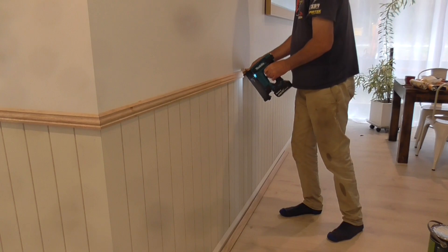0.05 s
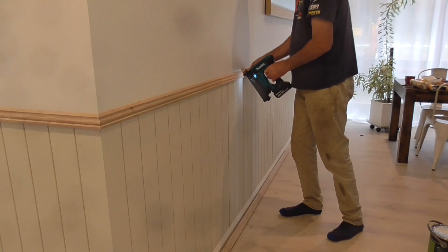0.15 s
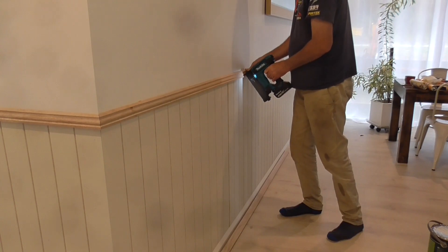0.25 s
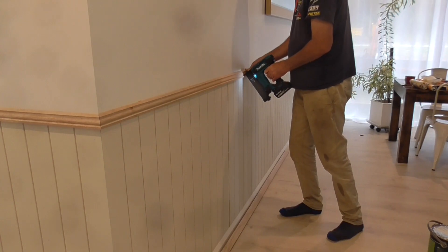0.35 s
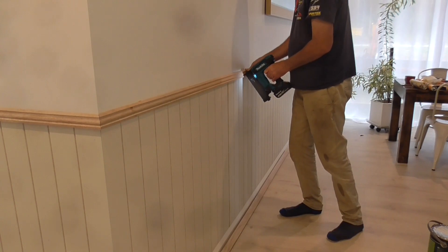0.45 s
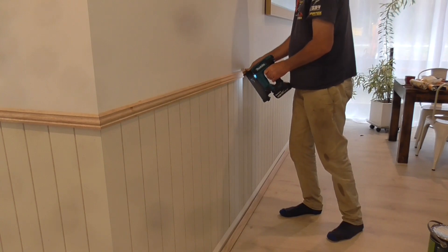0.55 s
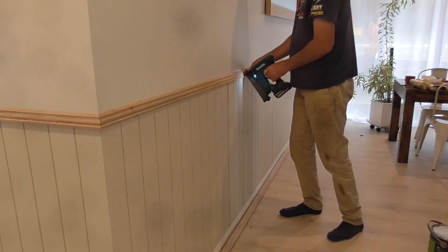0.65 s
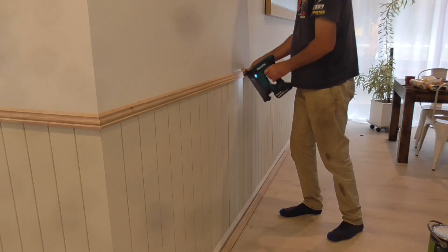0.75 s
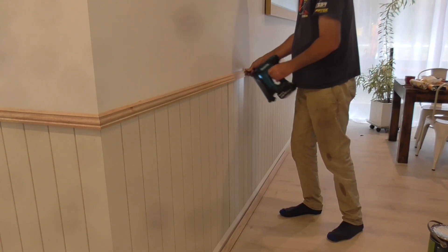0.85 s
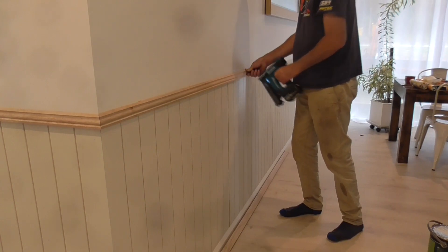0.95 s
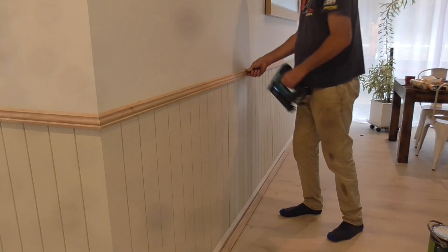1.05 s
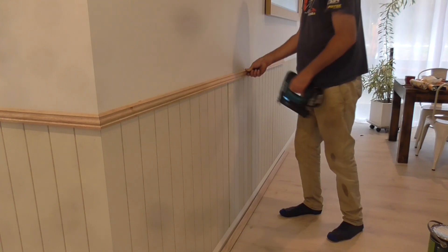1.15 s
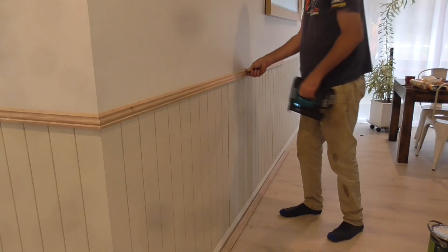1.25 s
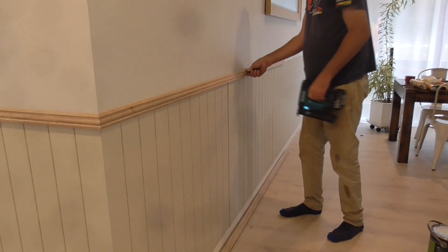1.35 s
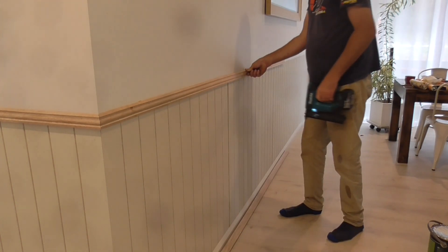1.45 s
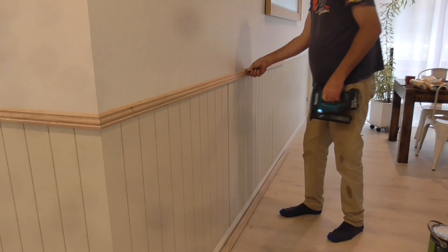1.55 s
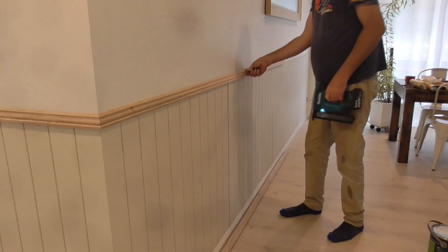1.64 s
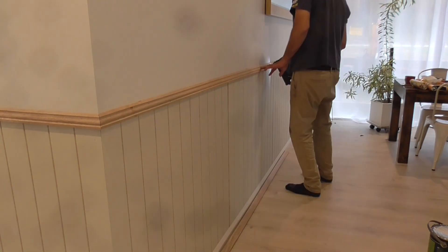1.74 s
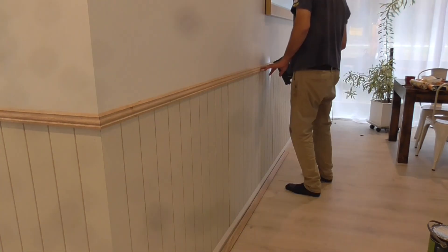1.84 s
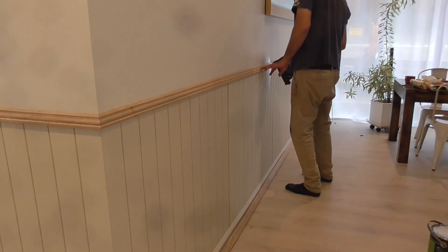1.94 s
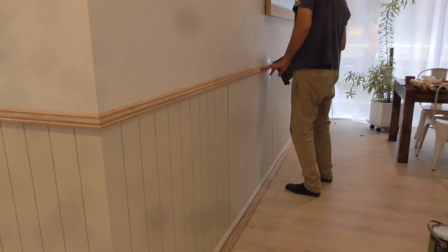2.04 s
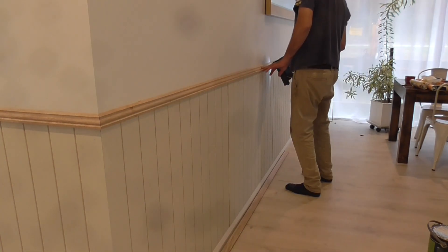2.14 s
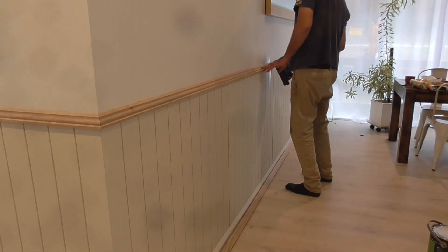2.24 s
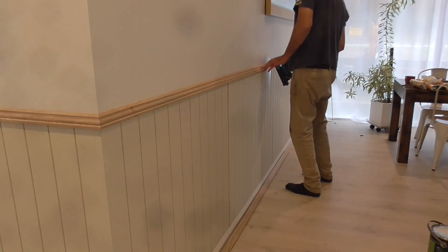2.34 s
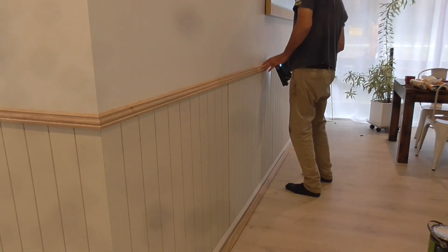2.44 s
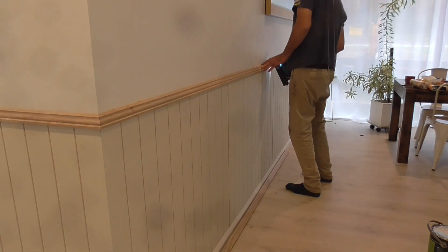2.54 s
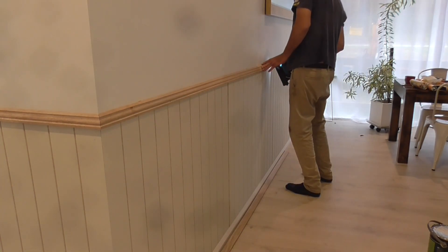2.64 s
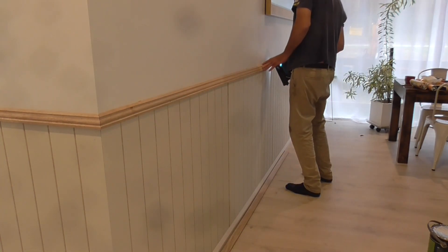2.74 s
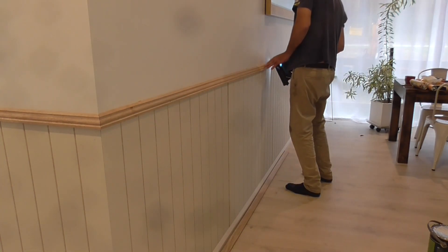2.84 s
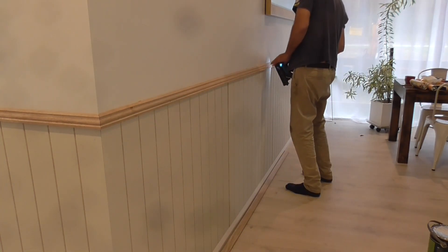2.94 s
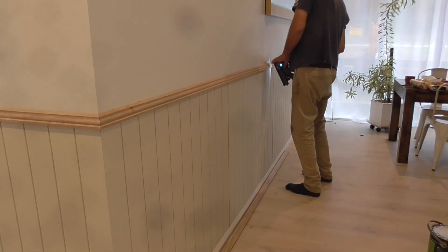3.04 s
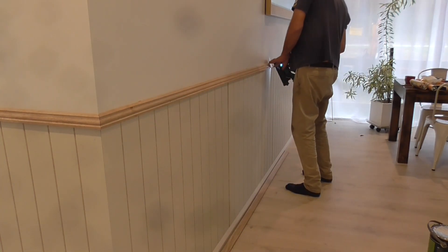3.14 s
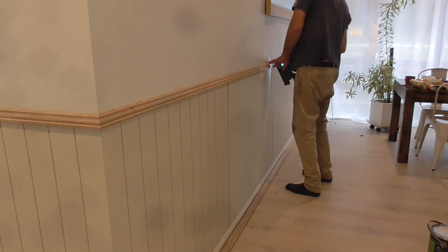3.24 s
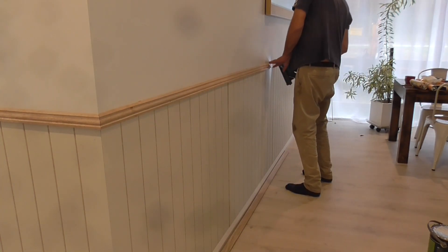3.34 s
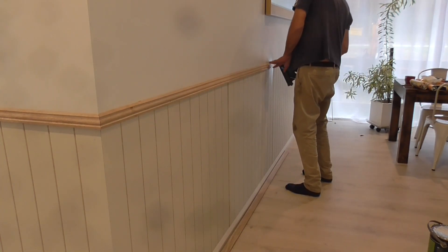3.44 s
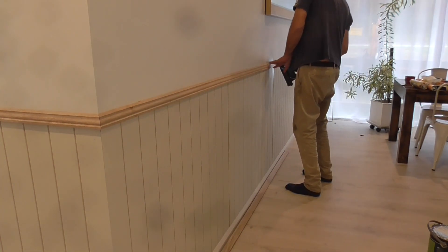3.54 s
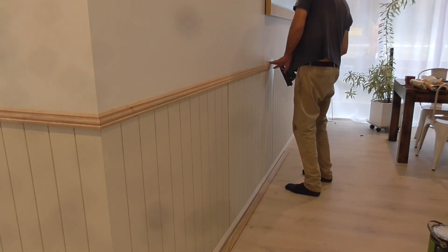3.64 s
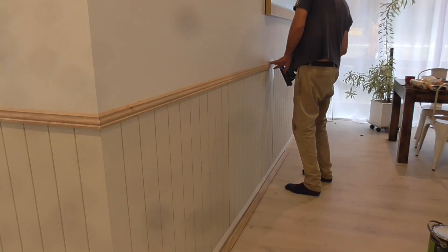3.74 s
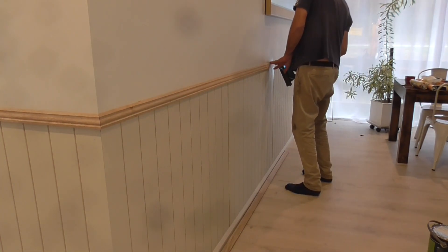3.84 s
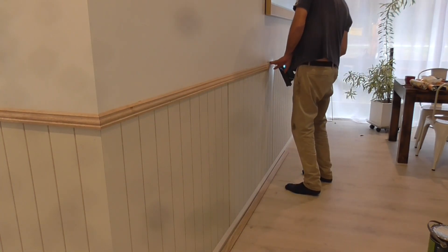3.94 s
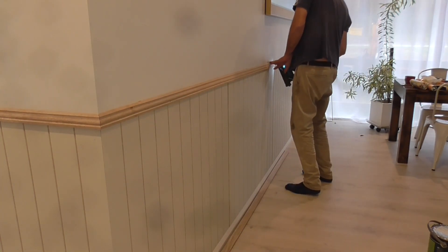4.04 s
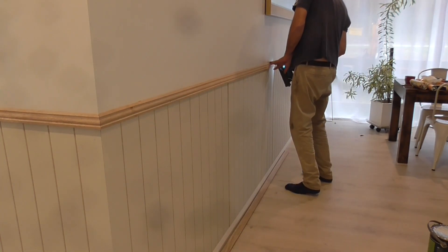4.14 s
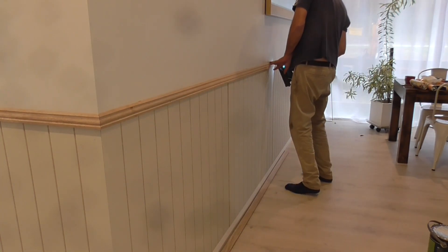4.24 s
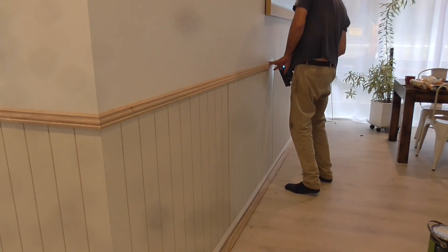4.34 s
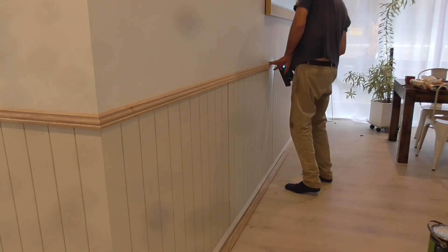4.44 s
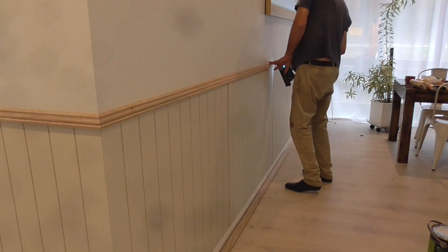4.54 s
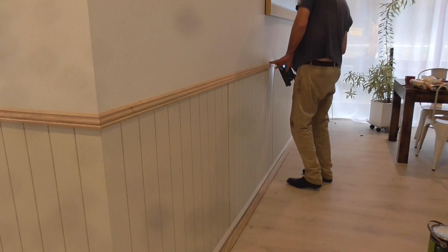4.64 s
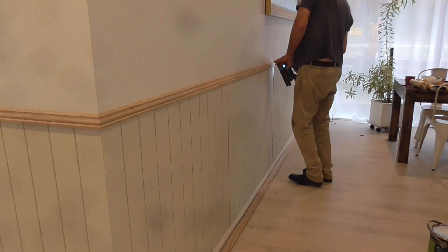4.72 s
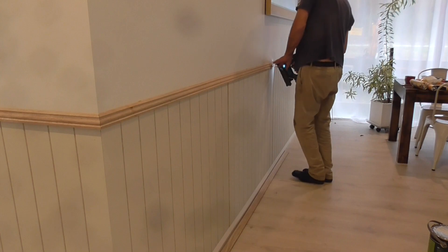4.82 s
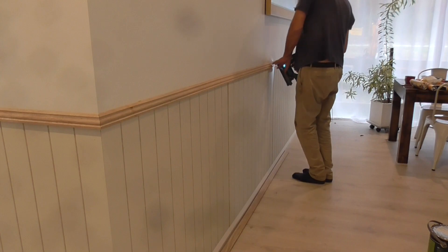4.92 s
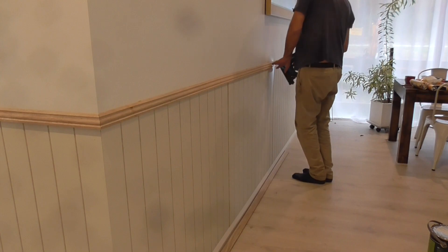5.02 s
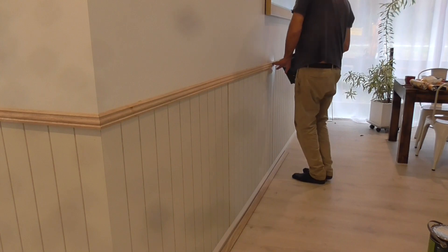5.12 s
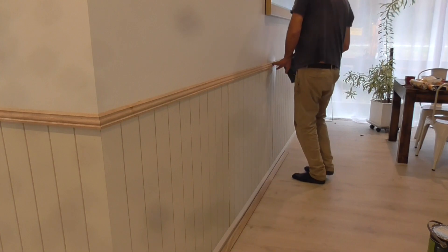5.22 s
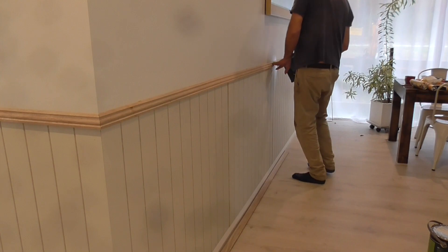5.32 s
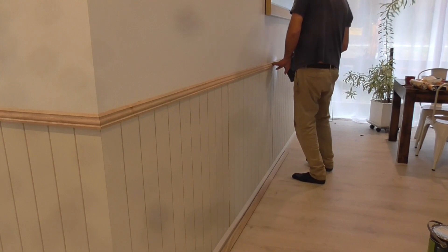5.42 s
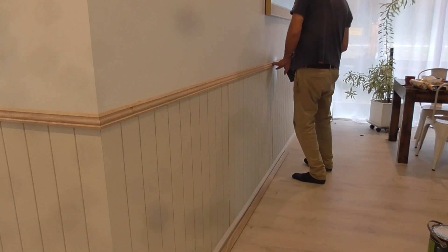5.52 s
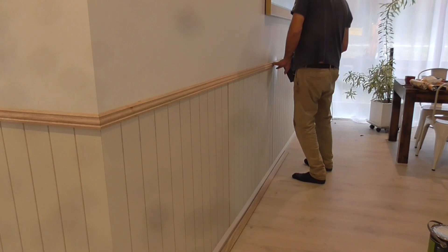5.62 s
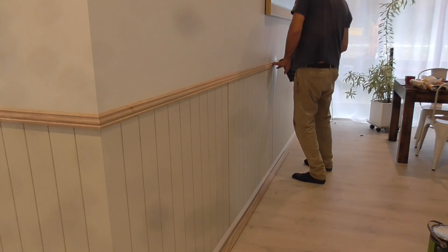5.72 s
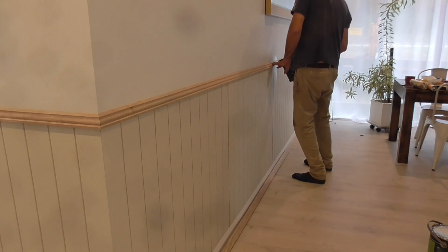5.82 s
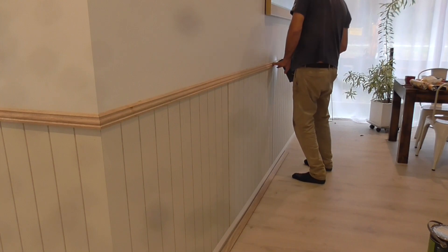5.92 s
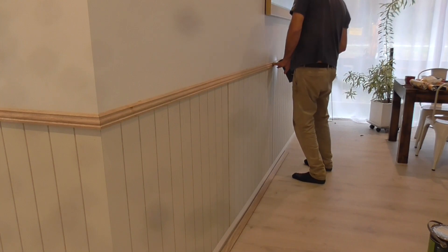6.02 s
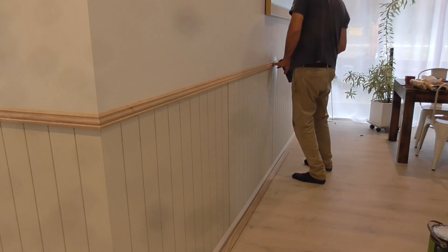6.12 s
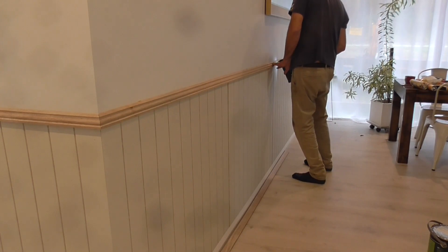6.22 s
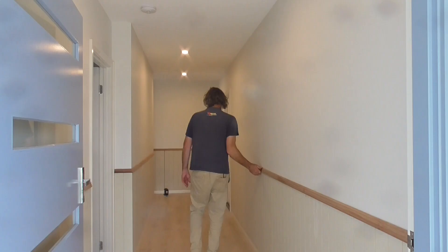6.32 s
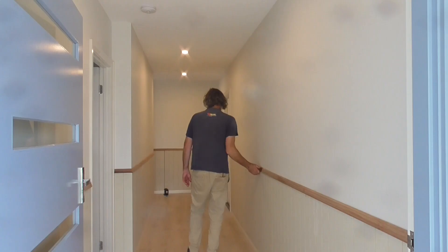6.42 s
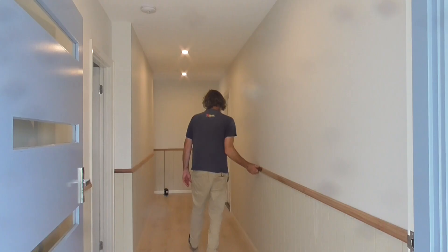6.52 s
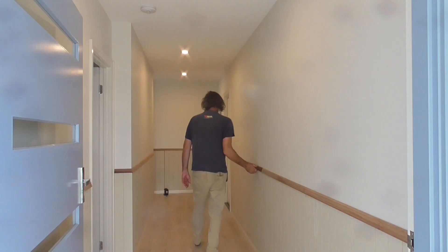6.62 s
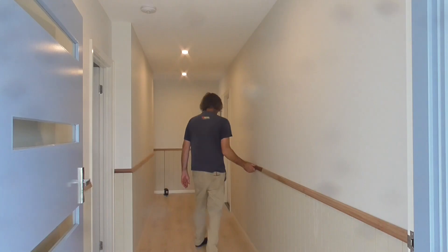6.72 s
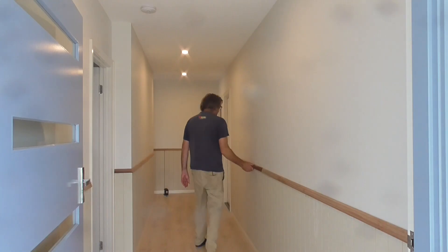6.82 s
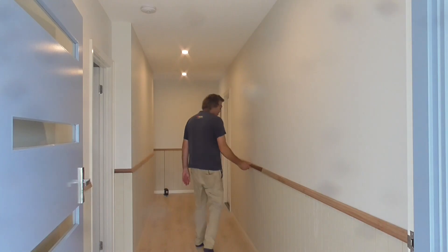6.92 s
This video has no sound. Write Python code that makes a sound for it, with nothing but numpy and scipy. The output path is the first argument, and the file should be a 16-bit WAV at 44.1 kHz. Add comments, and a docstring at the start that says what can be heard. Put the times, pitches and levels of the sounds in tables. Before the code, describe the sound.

A cordless nailer fixes a wooden rail to a wall, a few metres from the microphone in a reverberant, hard-floored room. Three times the tool knocks lightly on the wood, its motor whirrs briefly, a nail slams in with a loud crack, and the nose clicks back. A few soft knocks follow. At the very end, the quiet room tone gives way to a hallway's low hum and faint hiss.

```python
"""A cordless nailer pins a wooden rail to a panelled wall: three shots, metres away in a hard-floored room.
Each time the nose scuffs and knocks onto the rail, the trigger clicks, a geared motor winds the piston
against a gas spring, the driver slams the nail home and the nose springs back. These forces excite the
resonances of wood, housing and steel. The room reverberates and gain control ducks the shots.
At the end the room's hush gives way to a humming hallway, where a hand slides along a rail."""
import sys
import numpy as np
from scipy import signal
from scipy.fft import rfft, irfft
from scipy.io import wavfile
from scipy.ndimage import uniform_filter1d, minimum_filter1d

SR = 44100
rng = np.random.default_rng(int(sys.argv[2]) if len(sys.argv) > 2 else 0)


def put_to_file(sound):
    """Save the sound as 16-bit audio at rate SR, in the file named by the first command-line argument."""
    columns = np.atleast_2d(sound).T  # one column per channel
    safe = np.clip(columns, -1, 1)
    whole_steps = np.round(safe * 32767)
    wavfile.write(sys.argv[1], SR, whole_steps.astype(np.int16))


N = 307364
TIME = np.arange(N) / SR
WIND_UP_S, SCUFF_S = .096, .05  # motor start to strike; rubbing ahead of a contact


def undb(db):
    """Amplitude ratio of a level in decibels."""
    return 10 ** (np.asarray(db) / 20)


def unit(x):
    """Normalisation to unit energy."""
    return x / np.sqrt(np.sum(x ** 2))


def add(track, s, sound):
    """Superposition: a sound joins the track at time s."""
    start = max(int(s * SR), 0)
    track[start:start + len(sound)] += sound[:N - start]


def highpass(x, hz, order=1):
    """Butterworth filtering: frequencies below the cutoff are attenuated."""
    return signal.sosfilt(signal.butter(order, hz, "high", fs=SR, output="sos"), x)


def colour(x, spectrum, size=4096):
    """Minimum-phase filtering to a spectral shape; white noise keeps its power."""
    hz, db = np.transpose(spectrum)
    grid = np.maximum(np.fft.rfftfreq(size, 1 / SR), 1)
    magnitude = undb(np.interp(np.log(grid), np.log(hz), db))
    cepstrum = irfft(np.log(magnitude))
    cepstrum[1:size // 2] *= 2
    cepstrum[size // 2 + 1:] = 0
    response = unit(irfft(np.exp(rfft(cepstrum))))
    return signal.oaconvolve(x, response)[:len(x)]


def drift(rate_hz):
    """Slow random modulation with a spread near one."""
    return np.interp(TIME * rate_hz, np.arange(1000), rng.standard_normal(1000))


def tone(start, length, hz, db, waver, fade_db_per_s=0, edge_s=0.035):
    """A gated sinusoid with slight random frequency and amplitude modulation."""
    age = np.clip(TIME - start, 0, None)
    gate = np.clip(np.minimum(age, length + edge_s - age) / edge_s, 0, 1)
    turns = np.cumsum(hz * (1 + waver * drift(16))) / SR
    return np.sqrt(2) * np.sin(2 * np.pi * turns) * gate * undb(db - fade_db_per_s * age + 2 * drift(30))


def hush(spectrum, db, wide_hz):
    """Partly coherent noise: left and right are less alike above wide_hz."""
    mid, side = (colour(rng.standard_normal(N), spectrum) for _ in range(2))
    side = 0.57 * side + 0.19 * highpass(side, wide_hz)
    return undb(db + drift(6)) * (mid + np.array([side, -side]))


# Noise spectrum of the room's still air: (frequency [Hz], relative density [dB])
ROOM_AIR = [(15, -45.5), (25, -22), (40, -16.5), (97, -21), (166, -21.5), (317, -22), (641, -24),
            (695, -20.5), (1020, -28), (1130, -24.5), (1840, -34.5), (2900, -41.5), (4140, -38),
            (6050, -42), (11000, -39), (16000, -54)]
# Faint low drones: (start [s], duration [s], frequency [Hz], level [dB])
DRONES = [(1.77, 1.0, 90.2, -57.5), (4.275, 2.4, 118.4, -64)]
# Noise spectrum of the hallway: (frequency [Hz], relative density [dB])
HALL_AIR = [(15, -43), (25, -23), (64, 1), (108, -8), (223, -2), (301, -10.5), (363, -8), (405, -12),
            (840, -14), (1190, -20), (1480, -23), (1790, -28), (6050, -30), (9320, -21.5), (16000, -36)]
# Partials of the hallway hum: (frequency [Hz], level [dB])
HALL_HUM = [(75.4, -57.5), (226.1, -61), (371.4, -59), (1475, -73)]
# Friction spectrum of a hand on the hallway rail: (frequency [Hz], relative density [dB])
HAND_RUB = [(1500, -30), (2900, -10), (3650, 3), (4500, 2), (6500, -18), (12000, -32)]


def background(quieter_from_s=1.765, hallway_from_s=6.402):
    """Ambient noise and tones: the room's hush and drones, then the hallway's hiss, hum and friction."""
    hum = 0
    for hz, db in HALL_HUM:
        amplitude = np.sqrt(2) * undb(db + 6.3 * drift(28))
        hum += amplitude * np.sin(2 * np.pi * hz * TIME + .5 * drift(9.1))
    drone = sum(tone(*row, waver=0.018) for row in DRONES)
    air_db = np.where(TIME < quieter_from_s, -55.5, -59.5)
    room = hush(ROOM_AIR, air_db, wide_hz=600) + drone
    hand = hush(HAND_RUB, db=-65.5 + 0.73 * drift(7.7), wide_hz=2000)
    hallway = hush(HALL_AIR, db=-48.4, wide_hz=2980) + hum + hand
    return np.where(TIME < hallway_from_s, room, hallway)


# Reverberant field: (frequency [Hz], T60 [s], echo-to-direct ratio [dB], left-right coherence [0-1])
ROOM_ECHOES = [(58, 0.54, -3.5, 0.89), (298, 0.86, 2.5, 0.89), (1000, 1, -3.5, 0.77), (2150, 1, -1, 0.73),
               (4570, 0.83, -1, 0.76), (8150, 0.72, -5, 0.2), (12000, 0.47, -6.5, 0.18),
               (16050, 0.49, -2, 0.11)]


def reverberation(x, gap_s=0.0018, build_s=0.0019, right_db=0.5, early=1.33, early_s=0.07, bands=18):
    """Direct sound plus a diffuse field, whose top treble decays sooner and is less coherent."""
    hz, *columns = np.transpose(ROOM_ECHOES)
    t = TIME[:SR]
    centres = np.geomspace(60, 16000, bands)
    noise = rfft(rng.standard_normal((2, SR)))
    swell = 1 - np.exp(-np.maximum(t - gap_s, 0) / build_s)
    swell *= 1 + early * np.exp(-t / early_s)  # the near wall and floor crowd the first echoes
    response = np.zeros((2, SR))
    for centre, pick in zip(centres, np.eye(bands)):
        t60, db, coherence = (np.interp(np.log(centre), np.log(hz), c) for c in columns)
        mid, side = irfft(noise * np.interp(np.arange(SR // 2 + 1), centres, pick))
        pair = np.sqrt((1 + coherence) / 2) * mid + np.sqrt((1 - coherence) / 2) * np.array([side, -side])
        # the bare wall reflects more treble to the right
        balance = undb(right_db * (1 - coherence) * np.array([[-1], [1]]))
        response += balance * pair * undb(db) * unit(swell * np.exp(-np.log(1000) * t / t60))
    response[:, 0] += 1
    return signal.oaconvolve(x[None], response, axes=1)[:, :N]


def scattering(x, split_hz=6500, side_db=-2, right_db=-12, scatter_s=0.00092, size=256):
    """Scattering by a small body at the listening point sends treble unequally to left and right."""
    treble = highpass(x, split_hz)
    t = TIME[:size]
    paths = unit(rng.standard_normal(size) * t * np.exp(-t / scatter_s))
    side = undb(side_db) * signal.oaconvolve(treble, paths)[:N] - undb(right_db) * treble
    return np.array([side, -side])


# Low ring after each blow: (frequency [Hz], level [dB], decay rate [dB/s])
RINGS = [(408.7, -41, 18), (341, -34, 43.5), (510, -48.5, 30)]


def lingering_rings(strikes, length_s=0.65):
    """Free decay: each blow leaves a low tone, different at each place along the rail."""
    return sum(tone(s, length_s, hz, db, waver=0.0059, fade_db_per_s=fade)
               for s, (hz, db, fade) in zip(strikes, RINGS))


# Modes of the rail and wall panels: (frequency [Hz], relative level [dB], T60 [s])
WALL_MODES = [(103, -9.5, .3), (133, -5, 0.26), (172.1, -2.5, 0.32), (287.5, -9.5, 0.65),
              (296.4, 2.5, 0.23), (332.2, 3.5, 0.22), (394.8, -8.5, 0.63), (418, 6.5, 0.059),
              (518, -3.5, 0.12), (548, -5, 0.2), (710, -16, 0.06), (908, -1.5, 0.11), (1046, -4, 0.073),
              (1190, -7.5, 0.19)]
# Responses of rail, hollow wall, plastic housing, steel nose, spring: (frequency [Hz], relative gain [dB])
WOOD = [(35, -35.5), (70, -19), (130, -15.5), (320, 5), (520, 4), (700, -6.5), (1150, -5.5), (1750, -19),
        (4000, -25.5), (12000, -43)]
THUD = [(30, -38.5), (65, -3.5), (110, -5), (165, -2), (220, -7.5), (300, -8), (700, -24.5), (3000, -59)]
HOUSING = [(120, -6.5), (350, -2.5), (620, -5.5), (820, -3.5), (1080, -1), (1290, -2.5), (1500, -8),
           (1800, -19.5), (4000, -21.5), (12000, -32.5)]
STEEL = [(200, -15.5), (1200, -6.5), (1900, -8), (3500, 1.5), (5200, -1), (9000, 5.5), (12000, -3),
         (16000, -19)]
SPRING = [(300, -24), (1500, -12), (2600, -22), (3600, -8), (5500, -10), (7500, -3.5), (9500, -3),
          (12000, -12.5), (15500, -29.5)]


def radiation(forces):
    """Forced vibration: five bodies each filter their force; the rail knocks dead, the panels ring on."""
    wood, thud, housing, steel, spring = forces
    t = TIME[:SR]
    modes = sum(undb(db) * np.sin(2 * np.pi * hz * t) * np.exp(-np.log(1000) * t / t60)
                for hz, db, t60 in WALL_MODES)
    panels = signal.oaconvolve(wood, unit(modes))[:N]
    wall = colour(wood, WOOD) + panels + colour(thud, THUD)
    return wall + colour(housing, HOUSING) + colour(steel, STEEL) + colour(spring, SPRING)


def contact(t60, chatter, size=8192, passes=5):
    """Impact force of unit energy: one impulse followed by decaying chatter."""
    fade = np.exp(-np.log(1000) * TIME[:size] / t60)
    push = chatter * unit(rng.standard_normal(size) * fade)
    push[0] += 1
    # a contact has no pitch of its own: flatten its spectrum while keeping it short
    for _ in range(passes):
        phase = np.angle(rfft(push * np.minimum(10 * fade, 1)))
        push = irfft(np.exp(1j * phase))
    return unit(push * np.minimum(20 * np.sqrt(fade), 1))


def scuff(rise_s):
    """Friction force of unit energy: noise that grows exponentially up to the moment of contact."""
    t = TIME[:int(SCUFF_S * SR)]
    return unit(rng.standard_normal(len(t)) * np.exp(t / rise_s))


# Tool and hand knocking on the rail: (time [s], knock level [dB], hard tick level [dB])
KNOCKS = [(0.132, -16, -36), (.163, -14.5, -20), (.170, -5.5, -8), (2.166, -13.5, -19.5), (2.183, -16, -20),
          (2.376, -11, -28), (2.389, -13, -15.5), (2.629, -25, -36), (3.908, -12, -15), (3.943, -16, -12.5),
          (4.102, -14, -22.5), (5.93, -16, -23), (5.984, -20, -30.5), (6.017, -14.5, -34.5),
          (6.08, -18.5, -40.5), (6.174, -12.5, -35.5)]


def knocks(settle_s=.016):
    """Friction, then impact: the tool scuffs, touches the rail, and its weight settles with a thud."""
    wood, thud, housing, steel, _ = forces = np.zeros((5, N))
    for s, db, tick_db in KNOCKS:
        add(wood, s - SCUFF_S, undb(db - 11) * scuff(rise_s=0.01))
        add(housing, s - SCUFF_S, undb(db - 16) * scuff(rise_s=0.022))
        touch = (s, db, db - 2, tick_db)
        settle = (s + settle_s, db - 10.5, db + 4.5, tick_db - 17)
        for at, wood_db, thud_db, hard_db in (touch, settle):
            add(wood, at, undb(wood_db) * contact(t60=0.075, chatter=4.9))
            add(thud, at, undb(thud_db) * contact(t60=.06, chatter=1.1))
            add(housing, at, undb(hard_db + 4) * contact(t60=0.1, chatter=2.8))
            add(steel, at, undb(hard_db) * contact(t60=0.14, chatter=13))
    return forces


# The nose springing back, and lighter ticks of the tool: (time [s], level [dB])
CLICKS = [(.897, -2.5), (1.683, -28.5), (3.3693, -0.5), (5.1415, -1), (5.597, -33)]


def spring_clicks(seat_s=0.0013, recoil_s=0.012):
    """Elastic return: a sprung part scrapes along the housing and strikes its stop."""
    wood, thud, housing, steel, spring = forces = np.zeros((5, N))
    for s, db in CLICKS:
        friction = undb(db) ** 2  # only long throws rub much
        add(housing, s - SCUFF_S, undb(-6.5) * friction * scuff(rise_s=.018))
        add(steel, s - SCUFF_S, undb(-9) * friction * scuff(rise_s=.0075))
        add(spring, s - seat_s, undb(db) * contact(t60=.026, chatter=18))
        add(housing, s - seat_s, undb(db - 10) * contact(t60=0.047, chatter=5.9))
        # the jolt reaches the rail a moment later
        add(wood, s + recoil_s, undb(db - 17) * contact(t60=0.067, chatter=2.2))
        add(thud, s + recoil_s, undb(db - 13) * contact(t60=0.052, chatter=2.6))
    return forces


# Spectrum of the gears rattling in the housing: (frequency [Hz], relative density [dB])
GEARS = [(80, -34.5), (300, -7), (600, -4), (900, -9), (1250, -1.5), (1750, -12), (2100, -5), (2800, -13),
         (4200, -5), (6200, -8), (8200, 1), (11500, 0), (13500, -12), (16000, -20.5)]


def motor(start, db, tooth_hz=441.2, slowing_per_s=0.65, snap_s=0.002, scatter_db=1.5, grind=0.12):
    """Gear-mesh noise: teeth snap past each other, modulating a rattle at the meshing frequency."""
    lead_s, full_effort_s, coast_from_s = .01, .002, 0.17
    rise_db_per_s, sag_db_per_s, coast_db_per_s = 2004, 6, 480
    t = TIME[:SR // 4] - lead_s
    effort_db = -rise_db_per_s * np.maximum(full_effort_s - t, 0) - sag_db_per_s * t
    effort_db -= coast_db_per_s * np.maximum(t - coast_from_s, 0)
    # the gas spring loads the motor, so the teeth slow down
    teeth = np.cumsum(tooth_hz * (1 - slowing_per_s * (t - .05))) / SR
    force = undb(scatter_db * rng.standard_normal(256))[teeth.astype(int) % 256]
    snaps = force * (grind + np.exp(-(teeth % 1) / tooth_hz / snap_s))
    rattle = snaps * rng.standard_normal(len(t)) / np.sqrt(np.mean(snaps ** 2))
    track = np.zeros(N)
    add(track, start - lead_s, rattle * undb(db + effort_db))
    return colour(track, GEARS)


def shot(start, blow_db, crack_db, trigger_lead_s=.038, catch_s=.023, release_lead_s=.006):
    """Impulsive excitation: the trigger clicks, then the gas spring's stored energy drives the nail."""
    wood, thud, housing, steel, spring = forces = np.zeros((5, N))
    strike = start + WIND_UP_S
    add(spring, start - trigger_lead_s, undb(-20) * contact(t60=.14, chatter=12))
    add(housing, start - trigger_lead_s, undb(-30) * contact(t60=.1, chatter=9))
    # the lifter catches the piston, later lets it fly
    add(housing, start + catch_s, undb(6) * contact(t60=0.098, chatter=7))
    add(steel, start + catch_s, undb(5) * contact(t60=.045, chatter=3.5))
    add(steel, strike - release_lead_s, undb(crack_db + 7) * contact(t60=0.081, chatter=9))
    # the driver hits the nail
    add(housing, strike, undb(blow_db + 15) * contact(t60=.03, chatter=3.4))
    add(wood, strike, undb(blow_db + 13) * contact(t60=.11, chatter=3.7))
    add(thud, strike, undb(blow_db - 1) * contact(t60=0.37, chatter=1.3))
    return forces


# The three shots: (motor start [s], motor level [dB], blow level [dB], steel crack level [dB])
SHOTS = [(0.4, -17.5, -2, 7), (2.684, -15.5, 2, 7), (4.457, -15, -0.5, 5)]


def nailer(cutoff_hz=70):
    """Superposition of gears and impacts, with the deep bass cut away by a high-pass filter."""
    gears = sum(motor(start, db) for start, db, _, _ in SHOTS)
    blows = sum(shot(start, blow_db, crack_db) for start, _, blow_db, crack_db in SHOTS)
    impacts = radiation(blows + knocks() + spring_clicks())
    return highpass(gears + impacts, cutoff_hz, order=3)


# Moves of the nailer to a new place along the rail: (time [s])
MOVES = [1.9, 3.8, 5.8]


def scene(tool_db=-0.5):
    """Superposition of nailer and background; each place along the rail has its own room response."""
    tool = undb(tool_db) * nailer()
    place = np.searchsorted(MOVES, TIME)
    parts = [tool * (place == k) for k in range(len(MOVES) + 1)]
    heard = sum(scattering(part) + reverberation(part) for part in parts)
    strikes = [start + WIND_UP_S for start, *_ in SHOTS]
    return heard + lingering_rings(strikes) + background()


def gain_control(x, threshold_db=-19, slope=0.79, hold_s=0.061, release_db_per_s=65, window=400):
    """Compression: loud sound pulls the gain down; it holds, then climbs back and lifts the echo."""
    power = uniform_filter1d(np.mean(x ** 2, axis=0), window)
    excess_db = np.maximum(10 * np.log10(np.abs(power) + 1e-12) - threshold_db, 0)
    half_hold = int(hold_s * SR / 2)
    held_db = minimum_filter1d(-slope * excess_db, 2 * half_hold + 1, origin=half_hold)
    climb_db = release_db_per_s * TIME
    gain_db = np.minimum.accumulate(held_db - climb_db) + climb_db
    return x * undb(uniform_filter1d(gain_db, window // 2))


def record(dry, top_hz=15900):
    """Band limiting: a steep low-pass filter follows the gain control."""
    lowpass = signal.ellip(10, .2, 80, top_hz, fs=SR, output="sos")
    return signal.sosfilt(lowpass, gain_control(dry))


dry = scene()
out = record(dry)
put_to_file(out)
```